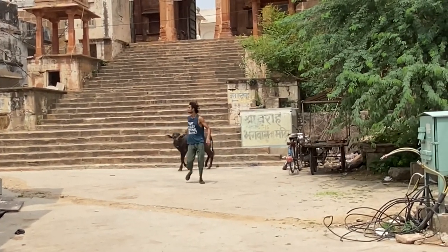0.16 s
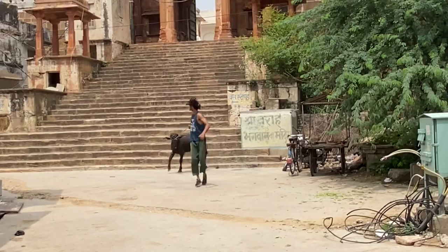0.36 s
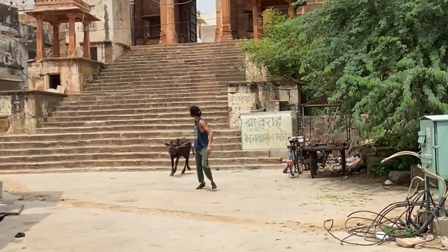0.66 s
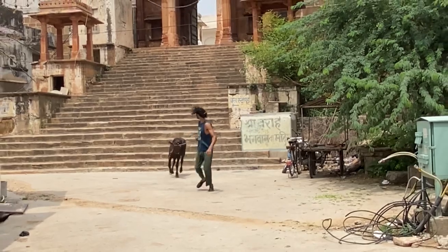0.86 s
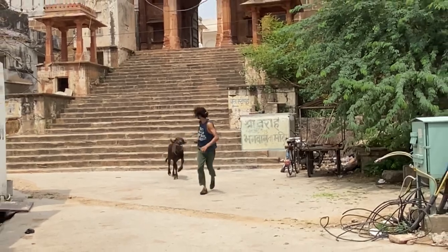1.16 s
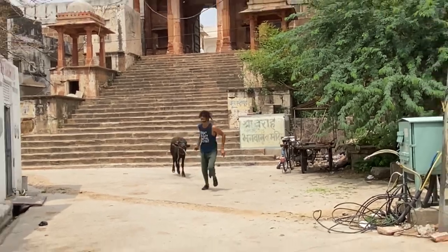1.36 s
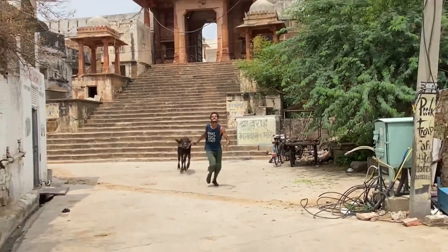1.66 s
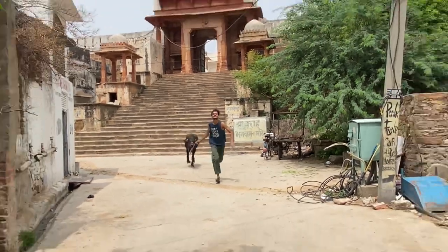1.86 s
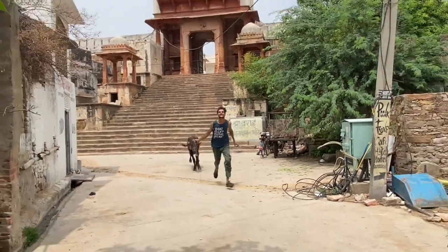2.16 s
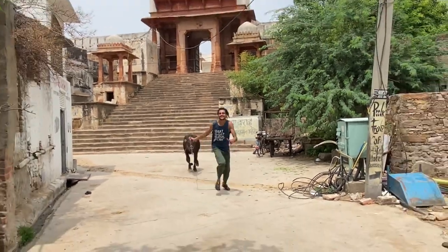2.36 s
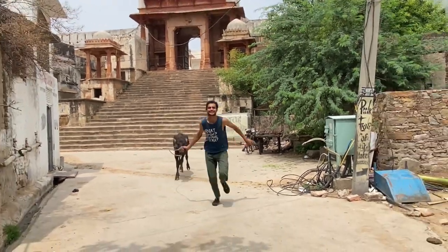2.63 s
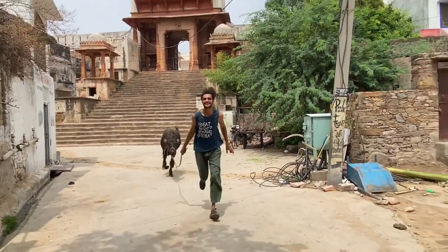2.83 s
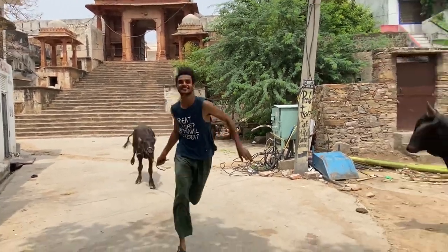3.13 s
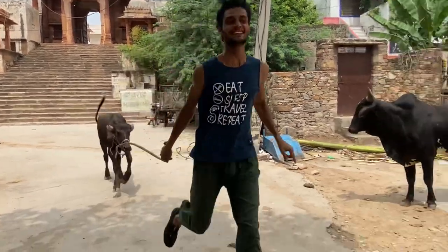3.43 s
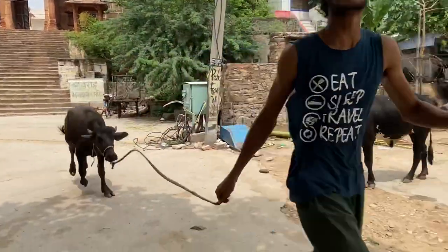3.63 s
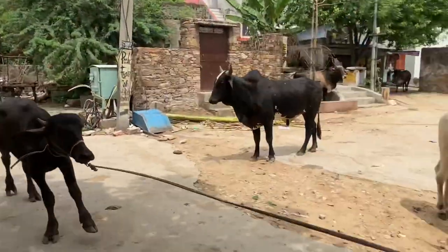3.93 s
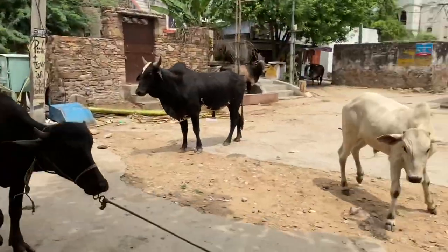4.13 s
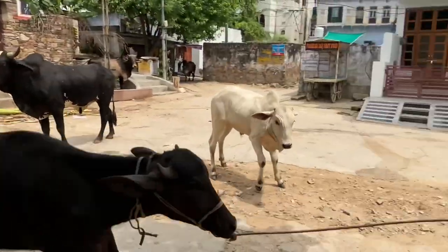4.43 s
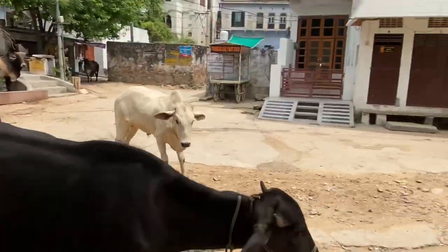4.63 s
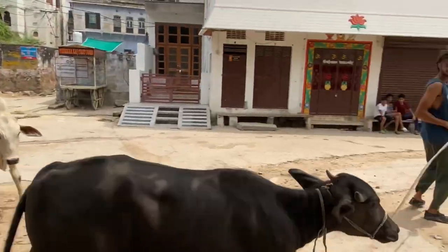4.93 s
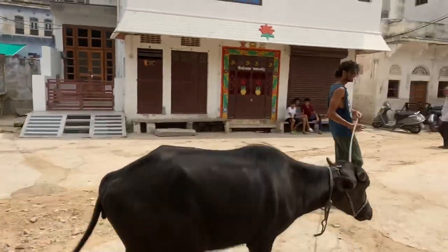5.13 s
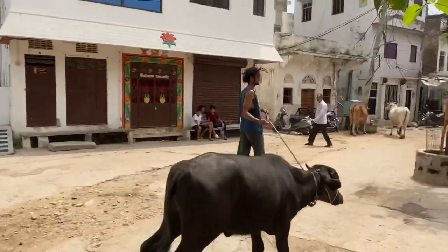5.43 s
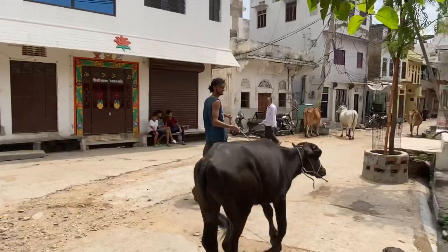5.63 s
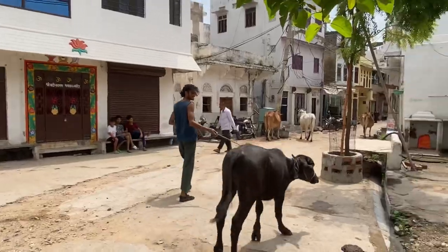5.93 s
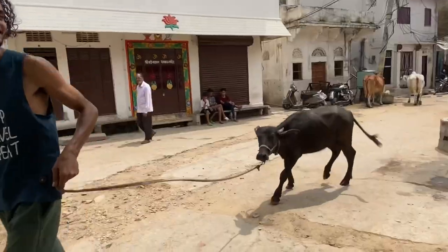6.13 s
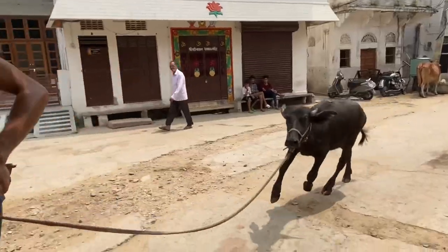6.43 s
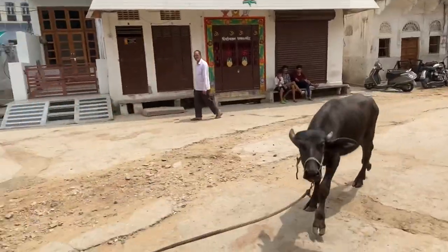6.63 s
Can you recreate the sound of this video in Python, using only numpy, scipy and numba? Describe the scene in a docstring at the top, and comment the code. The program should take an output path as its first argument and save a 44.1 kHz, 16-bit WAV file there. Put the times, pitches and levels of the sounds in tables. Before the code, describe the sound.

Outdoors between hard walls, a soft village hum lies under distant low calf moos and three quick sparrow cheeps. The calf and a person in sandals approach: damped thuds, gritty scuffs and little bells jingling. The moos become near, throaty and pulsing, moving rightward and back. Two faint bird whistles follow, then a tiny dropout, duller quieter air, and one abrupt, mouthy moo at the end. The portable stereo microphone stays in the street.

```python
"""A buffalo calf trots down a stone street, grunting low moos: vocal pulses ring its body cavities.
It moos faintly at first while a sparrow cheeps in gliding tones and small bells rattle as decaying modes.
From 2 s hooves and sandals knock as damped thuds, feet scuff in noise grains, and the calf passes right of centre.
The level dips briefly at 6.07 s, and the hum is duller from there to the last moo at 6.6 s.
Throughout, walls echo by delayed feedback and the village hums in bands of noise."""
import sys
import numpy as np
from scipy import signal
from scipy.fft import rfft, irfft, next_fast_len
from scipy.io import wavfile
from scipy.ndimage import uniform_filter1d, map_coordinates
from numba import njit

SR = 44100
rng = np.random.default_rng(int(sys.argv[2]) if len(sys.argv) > 2 else 0)


def store_wav(level_fs):
    """Save 16-bit WAV to argv[1]."""
    pcm = np.round(np.clip(np.atleast_2d(level_fs), -1, 1) * 32767)
    wavfile.write(sys.argv[1], SR, pcm.T.astype(np.int16))


N = 299439
T = np.arange(N) / SR


def undb(db):
    """Decibel law: 20 dB is a tenfold amplitude."""
    return 10 ** (np.asarray(db) / 20)


def unit(x):
    """Normalisation to a root mean square of 1."""
    return x / np.sqrt(np.mean(x ** 2))


def noise():
    """White noise: equal mean power at every frequency."""
    return rng.standard_normal(N)


@njit
def moving_band(x, hz, width):
    """State-variable resonance: a band-pass with a moving centre, gain 1 there."""
    y, band_state, low_state = np.empty(len(x)), 0., 0.
    for i in range(len(x)):
        g, k = np.tan(np.pi * hz[i] / SR), width / hz[i]
        v = (band_state + g * (x[i] - low_state)) / (1 + g * (g + k))
        band_state, low_state = 2 * v - band_state, low_state + 2 * g * v
        y[i] = k * v
    return y


def band(x, hz, width_hz):
    """Resonance at a fixed or moving centre frequency."""
    return moving_band(x, hz + np.zeros(len(x)), float(width_hz))


def walk(rate):
    """Random modulation: levels held 1 / rate s and slewed twice."""
    hold = int(SR / rate)
    levels = np.repeat(rng.standard_normal(N // hold + 1), hold)
    return uniform_filter1d(uniform_filter1d(levels, hold), hold)[:N]


def curve(table):
    """Linear interpolation of each column over time."""
    s, *columns = np.transpose(table)
    return [np.interp(T, s, c) for c in columns]


@njit
def folds(hz, rough, chance):
    """Glottal excitation: a pulse at each closing of the vocal folds; roughness scatters period and size."""
    pulses, phase = np.zeros(len(hz) + 1), np.empty(len(hz))
    p, k = 1., 0
    for i in range(len(hz)):
        step = hz[i] * (1 + rough[i] * chance[k, 0]) / SR
        p += step
        if step == 0:  # a rate of zero rests the folds
            p = 1.
        elif p >= 1:
            p, k = p - 1, k + 1
            size = np.exp(rough[i] * chance[k, 1]) / np.sqrt(hz[i])
            # split between two samples, so the timing is finer than one
            pulses[i] += size * p / step
            pulses[i + 1] += size * (1 - p / step)
        phase[i] = p
    return pulses[:-1], phase


PATCHY_DB = 3.2  # scale of the random level walk of each resonance


def cavity(x, modes, drift):
    """Parallel formants, each applied twice so the valleys stay dark; levels swell and fade independently."""
    total = 0
    for k, (hz, width_hz, db) in enumerate(modes):
        once = band(x, hz * drift, width_hz)
        twice = band(once, hz * drift, width_hz)
        total = total + (-1) ** k * undb(db + PATCHY_DB * walk(9)) * twice
    return total


# Pulse-rate and effort curves, one list a moo: time_s, pulse_rate_hz, relative_effort_db
MOO_CURVES = [
    [(0.0, 84.1, -35), (0.12, 81.2, -34.5), (0.26, 81.54, -43.5), (.45, 78.57, -41.5), (0.7, 81.5, -41.5),
     (0.9, 77.45, -44.5), (1.02, 74.8, -58.5)],
    [(1.29, 63.4, -53), (1.48, 65.76, -37.5), (1.63, 60.4, -40.5), (1.69, 61.4, -59)],
    [(2.298, 56.95, -48), (2.36, 56.7, -37.5), (2.43, 58.04, -30.5), (2.53, 59.7, -35), (2.66, 69.02, -29),
     (2.82, 72.4, -31), (2.93, 69.3, -38.5)],
    [(3.2, 65.04, -40.5), (3.3, 66, -28), (3.41, 69.68, -19), (3.52, 66.7, -22.5), (3.72, 65.6, -32),
     (3.75, 65, -31)],
    [(4.578, 56.1, -38.5), (4.66, 57.3, -30), (4.725, 72.5, -23.5), (4.775, 72.9, -18.5),
     (4.85, 61.6, -23.5), (4.96, 64.56, -23.5), (5.07, 68.5, -33), (5.2, 71.4, -26), (5.34, 72.1, -23),
     (5.4, 69.93, -21.5), (5.48, 77.9, -26.5), (5.58, 74.1, -24), (5.66, 62, -37.5)],
    [(5.89, 64.5, -54), (6.03, 74.8, -33), (6.065, 75.8, -35.5)],
    [(6.63, 59.92, -50.5), (6.72, 63.8, -16.5), (6.79, 68.9, -14.5)],
]
# Voice of each moo: roughness (0-1), chest_db, nose_db (before the throat trade), relative to the mouth
MOO_VOICES = [(0.06, 0.5, -5.5), (0.202, -3.5, -11), (0.279, -4.5, -20), (0.347, -6.5, -14.5),
              (0.25, -5, -6.5), (0.261, 1, -4), (0.259, -15.5, -13)]
# Shape of throat and mouth: time_s, throat_hz, lower_mouth_hz (before scaling), upper_mouth_hz (same),
# throat_above_mouth_db
TRACT_SHAPE = [(0, 935, 1440, 1730, 2), (.2, 837, 1500, 1770, -9), (.54, 744, 1416, 1780, -8.5),
               (1.45, 893, 1555, 1848, -11.5), (2.32, 1010, 1430, 1890, -15.5),
               (2.7, 922, 1424, 1750, -11.5), (3.22, 895, 1462, 1950, -2), (3.45, 898, 1505, 1734, -10),
               (3.72, 826.6, 1444, 1910, -11), (4.6, 900, 1510, 1876, -3), (4.76, 832, 1382, 1750, 4),
               (5.02, 904, 1436, 1757, -4.5), (5.26, 929.7, 1380, 1692, -13.5),
               (5.4, 793.7, 1400, 1722, -3.5), (6.03, 847, 1411, 1690, 0), (6.7, 1080, 1547, 1760, -8)]
# Chest, nose and lip resonances: centre_hz, width_hz (of one pass), relative_level_db
CHEST_MODES = [(80, 96, 1.5), (240, 141, 3.5)]
NOSE_MODES = [(642, 129, 11.5), (353, 154, -6)]
# The lip centres rise with the upper mouth resonance
LIP_MODES = [(2327, 161, -7), (2830, 310, -9.5), (3353, 120, -14.5), (4310, 290, -24)]
THROAT_WIDTH_HZ, LOWER_WIDTH_HZ, LOWER_DB = 104, 101, 3.5
UPPER_WIDTH_HZ, UPPER_REST_HZ, UPPER_RISE_DB_PER_HZ = 307, 1783, 0.055
NOSE_TRADE = 0.38  # dB the nose gains for each dB the throat loses


def calf():
    """Source-filter principle: pulses and breath gated once a cycle excite cavities that change shape."""
    hz, effort_db = curve(np.vstack(MOO_CURVES))
    throat_hz, lower_hz, upper_hz, throat_db = curve(TRACT_SHAPE)
    starts, ends = np.transpose([(m[0][0], m[-1][0]) for m in MOO_CURVES])
    which = np.clip(np.searchsorted(starts, T + .02) - 1, 0, None)
    rough, chest_db, nose_db = np.transpose(MOO_VOICES)[:, which]
    rough = np.clip(rough, 0, 1)
    voiced = (T >= starts[which]) & (T <= ends[which])

    waver = 1 + .004 * walk(18)
    chance = rng.standard_normal((N // 300, 2)) * [.04, .5]  # scatter of period and of log size
    pulses, phase = folds(hz * waver * voiced, rough, chance)
    breath = unit(noise() * np.exp(-phase / .25))
    source = unit(pulses) + voiced * rough * breath

    jaw = 1 + .035 * walk(8)
    # a wider mouth raises its upper resonance and lets more of it out
    upper_db = UPPER_RISE_DB_PER_HZ * (upper_hz - UPPER_REST_HZ)
    mouth_modes = [(lower_hz, LOWER_WIDTH_HZ, LOWER_DB), (upper_hz, UPPER_WIDTH_HZ, upper_db)]
    mouth = cavity(source, mouth_modes, 0.98)
    # a chesty voice comes through half-closed lips
    lips = cavity(source, LIP_MODES, jaw * (upper_hz / UPPER_REST_HZ) ** .5)
    mouth = mouth + undb(-chest_db / 2 - 2.5) * lips

    chest = undb(chest_db) * unit(cavity(source, CHEST_MODES, jaw))
    nose = undb(nose_db - NOSE_TRADE * throat_db) * unit(cavity(source, NOSE_MODES, jaw))
    throat = undb(throat_db) * unit(cavity(source, [(throat_hz, THROAT_WIDTH_HZ, 0)], jaw))
    return undb(effort_db) * (unit(mouth) + chest + nose + throat)


# Hooves and sandals: start_s, relative_thud_db, thud_hz, relative_crack_db
FOOTFALLS = [(2.079, -43.5, 225, -65), (2.276, -49, 240, -56), (2.957, -29, 248.2, -68),
             (3.01, -36.5, 212, -41), (3.102, -30, 269, -51), (3.167, -22, 195.6, -27.5),
             (3.419, -21, 258, -50), (3.51, -20, 335, -23.5), (3.783, -24.5, 487, -27.5),
             (3.827, -22, 165.4, -42), (3.888, -27, 190, -33.5), (3.928, -33, 222, -39.5),
             (4.022, -29, 460, -33), (4.269, -21.5, 151, -41), (4.303, -30.5, 240, -28),
             (4.332, -26.5, 175, -32.5), (4.452, -18, 154, -23), (4.497, -21.5, 134.7, -35),
             (4.551, -34.5, 400, -30.5), (5.345, -27.5, 212, -25), (5.678, -30, 209.8, -56),
             (5.748, -36, 221, -51), (5.814, -33, 233, -55), (6.297, -45.5, 307, -53),
             (6.545, -40, 305, -55.5)]
SCRAPE_S = .025  # grit starts before the foot lands


def steps():
    """Impact of damped bodies: a thud rings and rumbles out; harder feet sound higher, brighter and grittier."""
    out = np.zeros(N + SR)
    t = np.arange(SR // 8) / SR - SCRAPE_S
    u = np.maximum(t, 0)  # time since landing
    for s, db, hz, crack_db in FOOTFALLS:
        snap_noise, grain_noise, grain_level = rng.standard_normal((3, len(t)))
        thud = np.sin(2 * np.pi * hz * u) * np.exp(-u / 0.011) * (1 - np.exp(-u / 0.003))
        crack_hz = 95 * np.sqrt(hz)
        snap = snap_noise * u / 0.00029 * np.exp(-u / 0.002)
        crack = band(band(snap, crack_hz, 4 * hz), crack_hz, 4 * hz)
        grains = grain_noise * undb(5 * np.repeat(grain_level, 130)[:len(t)])
        rumble = (t > 0) * np.exp(-u / 0.021) * unit(band(grains, 2 * hz, 500))
        thud = thud + 0.31 * rumble
        scrape = np.exp(np.minimum(t / 0.008, -t / 0.02))  # swells until landing, then dies
        grit = band(grains, 1800, 3000) * scrape * (hz / 1100) ** 2
        step = 3.24 * undb(db) * thud + 11 * undb(crack_db) * (crack + grit)
        out[int((s - SCRAPE_S) * SR):][:len(t)] += step
    return out[:N]


# Hard shakes of the bells: start_s, relative_level_db
BELL_SHAKES = [(0.941, -34), (2.274, -29), (4.53, -22), (4.854, -28.5), (5.4603, -30)]
# How hard the trot rattles them: time_s, relative_level_db
TROT_RATTLE = [(0, -105), (.6, -59.5), (3.3, -50), (6.79, -52)]
# Clear modes of the bells: pitch_hz (before the waver), relative_level_db
BELL_MODES = [(5150, 1.5), (5340, 4.5), (6060, -1), (10800, -1), (11790, 0)]
BELL_T60_S, BELL_RISE_S = .065, .004
BELL_WAVER = .016  # scale of the random detuning, share of pitch


def bells():
    """Modal ringing: pellets tick inside small bells, and each tick favours other modes."""
    chance = rng.random((1500, 2))
    at = (chance[:, 0] * N).astype(int)
    scatter_db = 10 * chance[:, 1] ** 3 + 4 * walk(14)[at]  # the rattle comes in bursts
    rattle_ticks = np.c_[at / SR, curve(TROT_RATTLE)[0][at] + scatter_db]
    ticks = np.vstack([rattle_ticks, BELL_SHAKES])
    share_db = 5 * rng.standard_normal((len(ticks), len(BELL_MODES)))
    log_decay = np.log(1000) / (BELL_T60_S * SR)  # 60 dB is a factor of 1000
    out = rattle = 0
    for (hz, db), share in zip(BELL_MODES, share_db.T):
        blows = np.zeros(N)
        np.add.at(blows, (ticks[:, 0] * SR).astype(int), undb(ticks[:, 1] + share + db - 3.5))
        pole = np.exp(2j * np.pi * hz / SR - log_decay)
        onset = pole * np.exp(-1 / (BELL_RISE_S * SR))  # the pellet rolls in, so the ring swells
        ring = signal.lfilter([pole - onset], np.poly([pole, onset]), blows)
        # loose pellets detune the ring
        swing = np.exp(2j * np.pi * np.cumsum(hz * BELL_WAVER * walk(150)) / SR)
        out = out + (ring * swing).imag
        rattle = rattle + blows
    # the many small modes between the clear ones blur into a hiss that dies with them
    hiss_level = signal.lfilter([1], [1, -np.exp(-log_decay)], rattle)
    return out + .1 * hiss_level * band(noise(), 11200, 4000)


# Scuffing of feet, louder as they come near: time_s, level_db
SCUFF_LEVEL = [(1.6, -78), (2.5, -68), (3.5, -38), (4.7, -38), (6.05, -44), (6.08, -88)]


def scuff():
    """Granular friction: dense sand grains under the feet in short drags, unrelated left and right."""
    drag_db = 5 * walk(35) + 6 * walk(7)
    grain_db = 2 * rng.exponential(size=(2, N)) + drag_db
    grains = rng.standard_normal((2, N)) * undb(grain_db)
    wide = np.array([band(g, 2000, 4500) + 5 * band(g, 330, 350) for g in grains])
    return unit(wide) * undb(curve(SCUFF_LEVEL)[0])


# Where the calf is: time_s, left_minus_right_db, left_lag_ms
CALF_PATH = [(3.3, -0.5, 0.042), (4.1, -12, 0.33), (4.7, -2, 0.17)]


def place(x):
    """Binaural cues: arrival time and level at two ports follow the path; the bass keeps its level."""
    pan_db, lag_ms = curve(CALF_PATH)
    at = np.arange(N) - np.outer([.5, -.5], lag_ms) * SR / 1000
    bass = band(x, 140, 140)
    sides = bass + (x - bass) * undb(np.array([pan_db, -pan_db]) / 2)
    return np.array([map_coordinates(c, [a], order=3) for c, a in zip(sides, at)])


HOARSE = .11  # scale of the birds' random pitch scatter, share of pitch


def whistle(s, length, from_hz, to_hz, db):
    """Frequency modulation: a gliding sine that fades in and out within a few ms."""
    on = uniform_filter1d(1. * ((T > s) & (T < s + length)), size=130)
    hz = from_hz + (to_hz - from_hz) * np.clip((T - s) / length, 0, 1) ** .75  # the glide slows
    hz *= (1 + HOARSE * walk(900) * (length < .05))  # short notes are hoarse, long notes clear
    return on * undb(db) * np.sin(2 * np.pi * np.cumsum(hz) / SR)


# A cheep is a rising and a falling note: start_after_cheep_s, length_s, from_hz, to_hz, relative_level_db
CHEEP_NOTES = [(0, 0.0185, 3580, 4430, -4), (0.016, 0.032, 7440, 3830, -8.5)]
# Cheeps of the sparrow: start_s, relative_level_db
SPARROW_CHEEPS = [(0.137, -34), (0.849, -34), (1.309, -33)]
# Two gliding notes around the second cheep, two later rising whistles:
# start_s, length_s, from_hz, to_hz, level_db
GLIDES_AND_WHISTLES = [(0.81, 0.038, 3300, 4970, -39), (0.87, 0.03, 3200, 3606, -35.5),
                       (5.475, .095, 4454, 5390, -45), (5.77, 0.12, 4614, 5220, -41)]


def chirps():
    """Gliding tones: three cheeps, two gliding notes around the second, and two later rising whistles."""
    cheeps = [np.add(note, [s, 0, 0, 0, db]) for s, db in SPARROW_CHEEPS for note in CHEEP_NOTES]
    return sum(whistle(*row) for row in cheeps + list(GLIDES_AND_WHISTLES))


@njit
def walls(x, lags, gain, damp):
    """Reverberation by feedback: eight delay lines feed each other, duller on every round."""
    line, soft, out = np.zeros((8, 4096)), np.zeros(8), np.zeros((2, len(x)))
    for i in range(len(x)):
        total = 0.
        for k in range(8):
            soft[k] += (1 - damp) * (gain[k] * line[k, (i - lags[k]) & 4095] - soft[k])
            total += soft[k]
            out[k % 2, i] += soft[k]
        for k in range(8):
            line[k, i & 4095] = x[i] + soft[k] - total / 4
    return out


# Spectrum of the village hum: centre_hz, relative_level_db (per Hz)
VILLAGE_SPECTRUM = [(30, 1), (60, 1), (240, -11.5), (1100, -23.5), (6000, -26), (15000, -38.5)]
VILLAGE_DB = -41.5


def village():
    """Band-filtered noise: half-octave bands swell together and flicker alone; the bass is alike on both sides."""
    out, swell = 0, walk(1.0)
    f, d = np.transpose(VILLAGE_SPECTRUM)
    for hz in 45 * 2 ** np.arange(0, 8.6, .5):
        mid, side = (band(band(noise(), hz, hz / 2), hz, hz / 2) for _ in range(2))
        db = np.interp(np.log(hz), np.log(f), d) + 1.5 * swell + 3 * walk(12)
        spread = min(hz / 900, .7) * side * np.array([[1], [-1]])
        out = out + undb(db) * (mid + spread)
    return unit(out) * undb(VILLAGE_DB)


STREET_T60_S, STREET_DAMP = 0.23, 0.1  # decay time before damping; share of smoothing
DIP_S, DIP_WIDTH_S, DIP_DB = 6.068, .01, -24  # the level dips briefly


def scene():
    """Superposition: near sources, birds, echo, hum and scuffing add up."""
    near, far = calf() + steps() + bells(), chirps()
    lags = rng.integers(150, 2600, size=8)  # samples
    gain = undb(-60 * lags / SR / STREET_T60_S)
    echo = walls(band(near, 1600, 8200) + far + 1e-18, lags, gain, STREET_DAMP)
    echo = echo * ((T < DIP_S) | (T > DIP_S + STREET_T60_S))  # the echo is silent just after the dip
    hum = village()
    hum_treble = np.array([band(c, 2560, 6900) for c in hum])
    hum = hum - 0.52 * (T > DIP_S) * hum_treble  # the hum is duller after the dip
    sound = place(near) + far + undb(-10) * echo + hum + scuff()
    return sound * undb(DIP_DB * np.exp(-((T - DIP_S) / DIP_WIDTH_S) ** 2))


# Phase of the shared treble: frequency_hz, left_lead (half turns)
TREBLE_TURN = [(7000, 0), (8300, 1), (9600, 1), (11500, 2), (13600, 2), (14500, 3)]
SHARED_HZ, TOP_HZ = 7200, 15700


def record(dry):
    """Linear filtering and saturation: shared treble with turned phase, rounded peaks, no rumble or top."""
    size = next_fast_len(N)
    left, right = rfft(dry, size)
    hz = np.arange(len(left)) * SR / size
    shared = 1 / (1 + (SHARED_HZ / (hz + 1)) ** 16)
    turned = left * np.exp(-1j * np.pi * np.interp(hz, *np.transpose(TREBLE_TURN)))
    right = right + 0.97 * shared * (turned - right)
    rumble_cut = hz ** 2 / (hz ** 2 + 40 ** 2)
    both = irfft(rumble_cut * [left, right], size)[:, :N]
    top_cut = signal.ellip(10, .2, 70, TOP_HZ, fs=SR, output="sos")
    return signal.sosfilt(top_cut, np.tanh(both))


dry = scene()
out = record(dry)
store_wav(out)
```